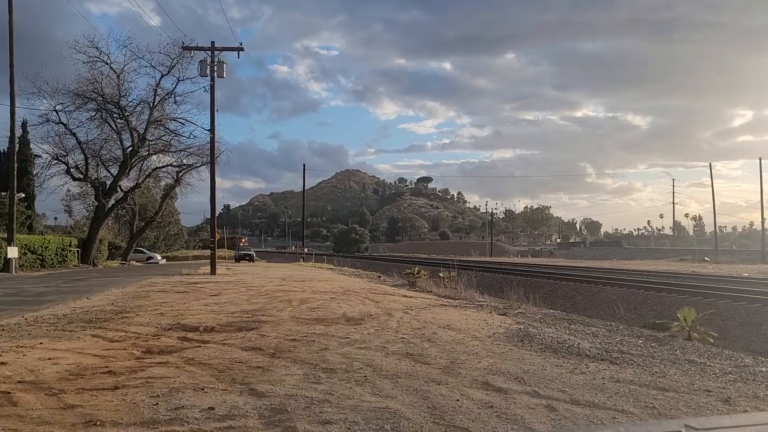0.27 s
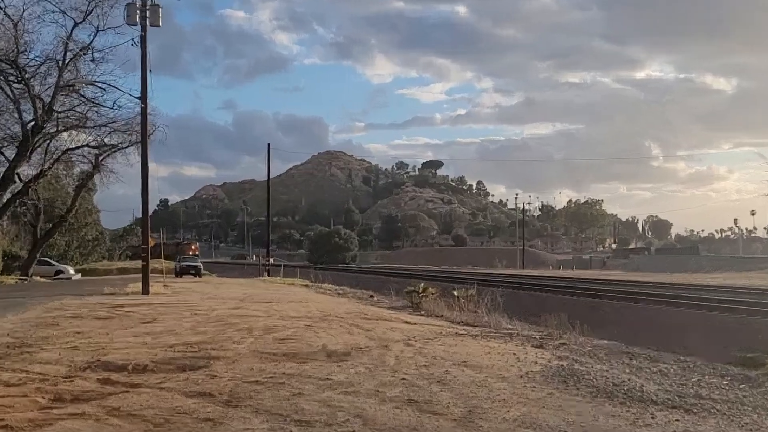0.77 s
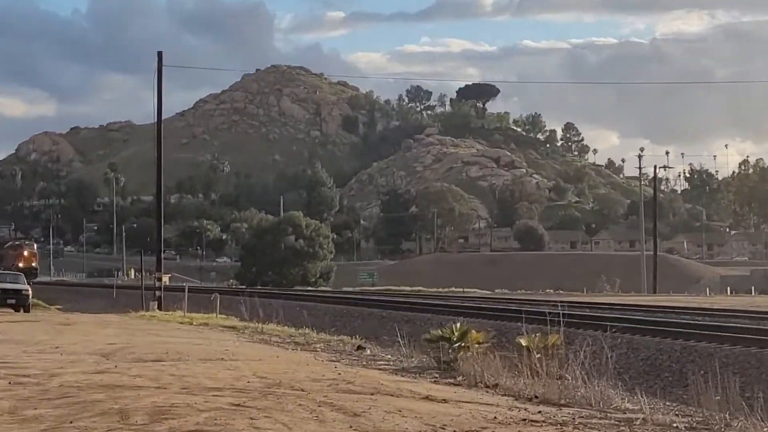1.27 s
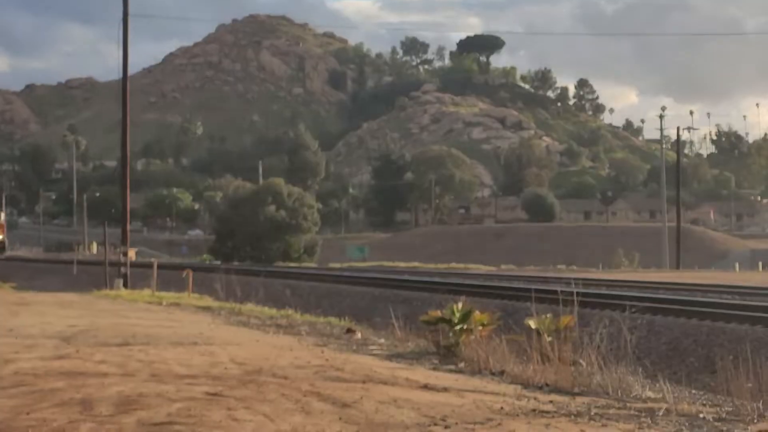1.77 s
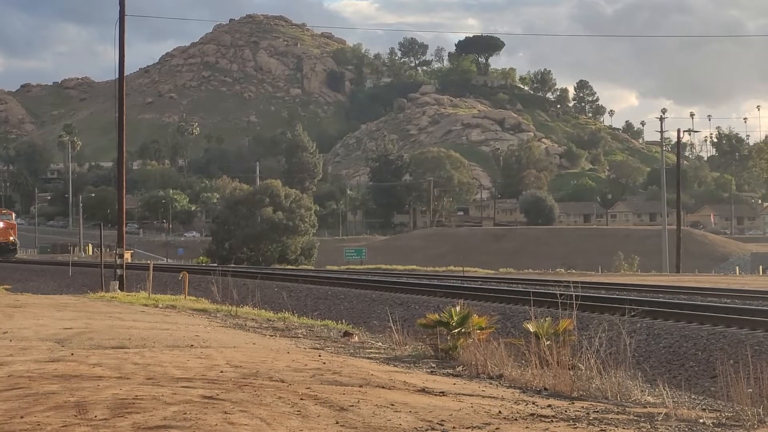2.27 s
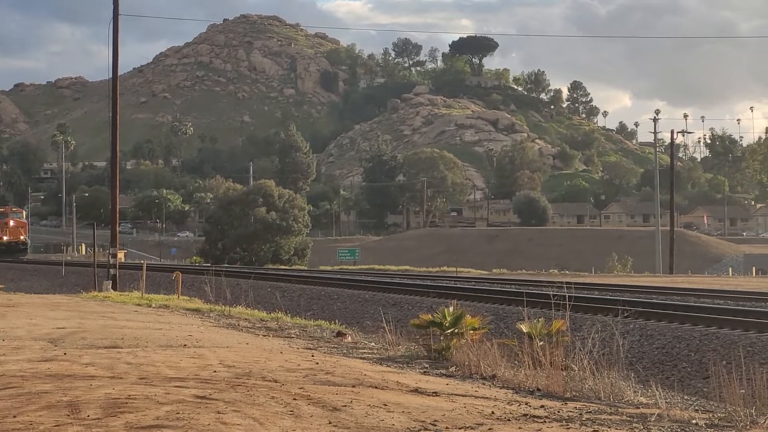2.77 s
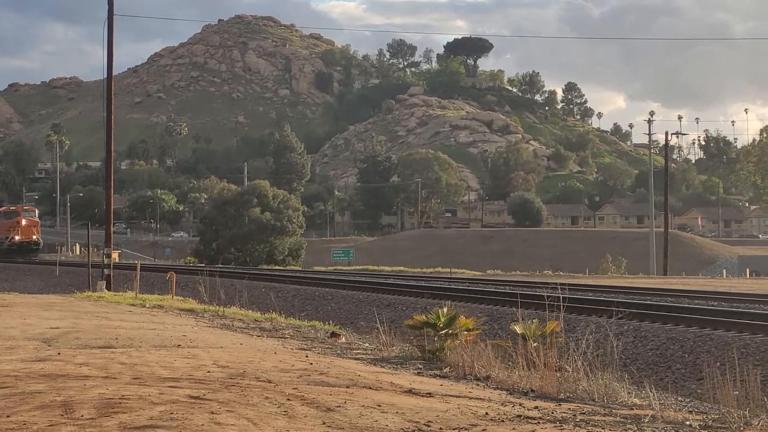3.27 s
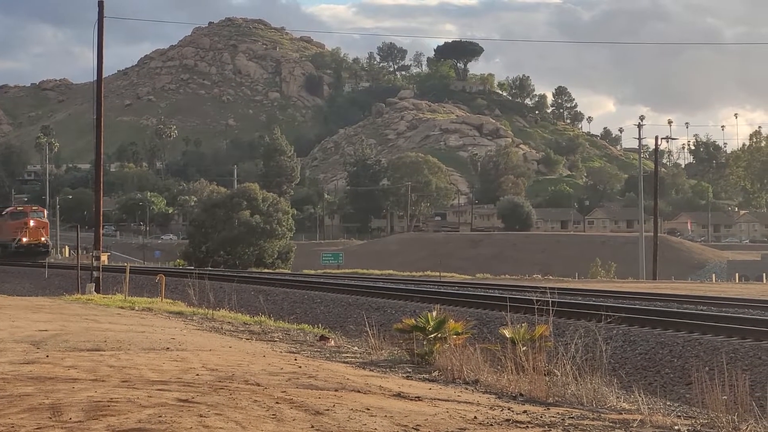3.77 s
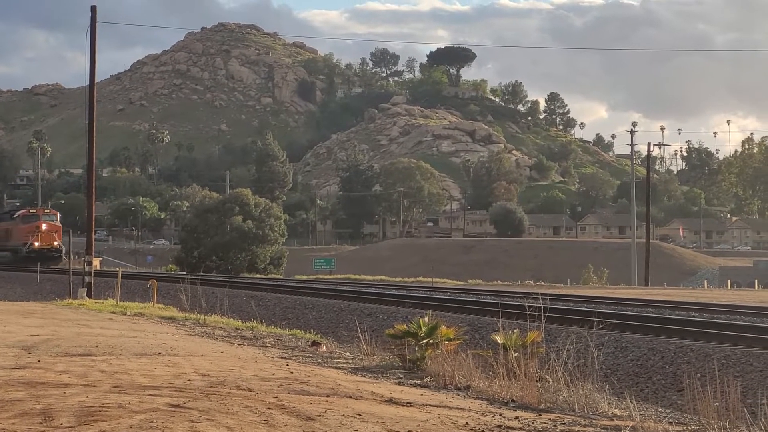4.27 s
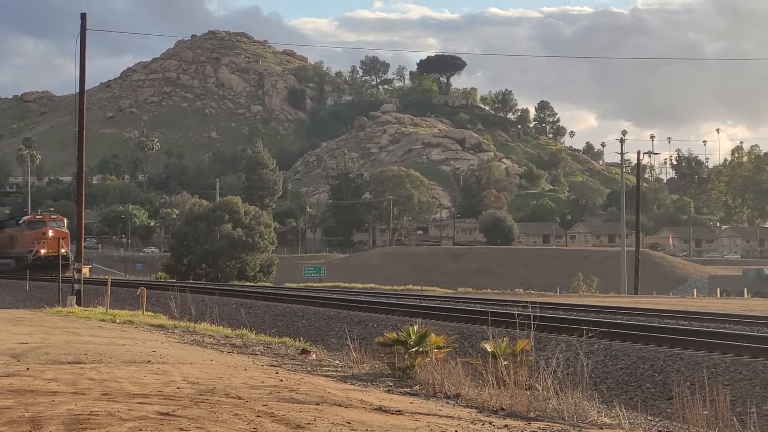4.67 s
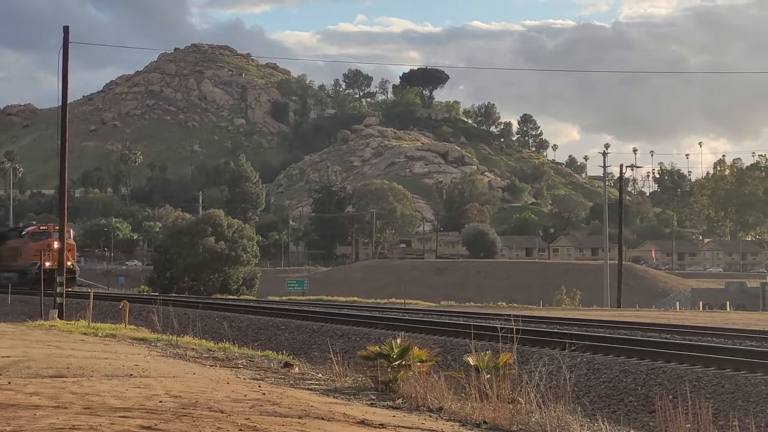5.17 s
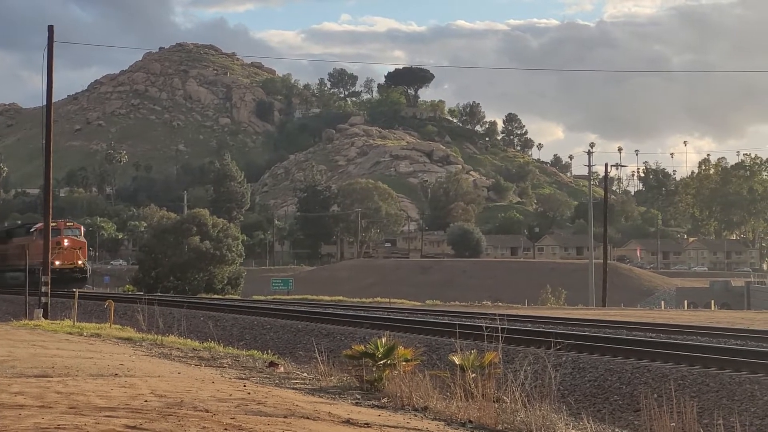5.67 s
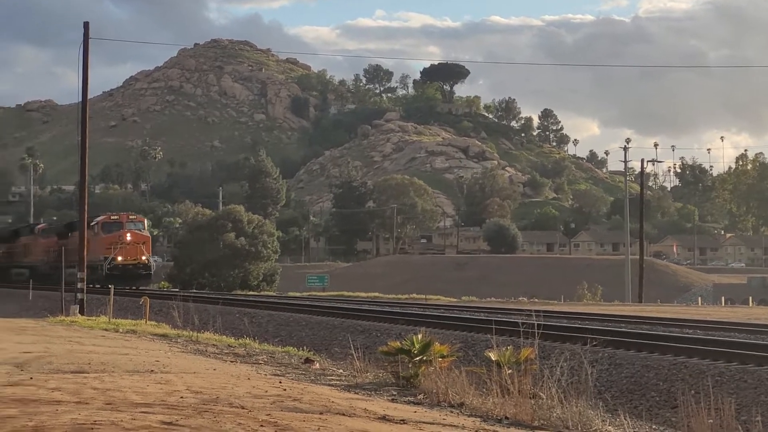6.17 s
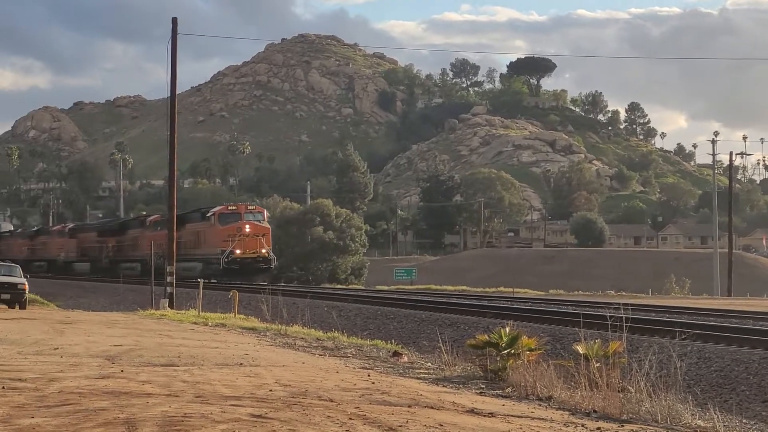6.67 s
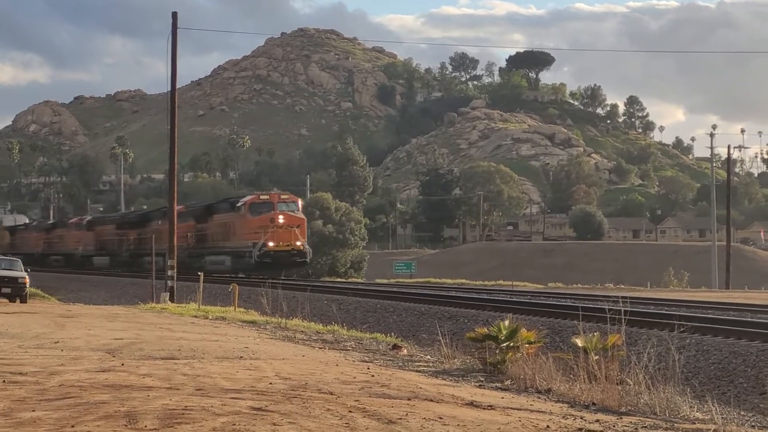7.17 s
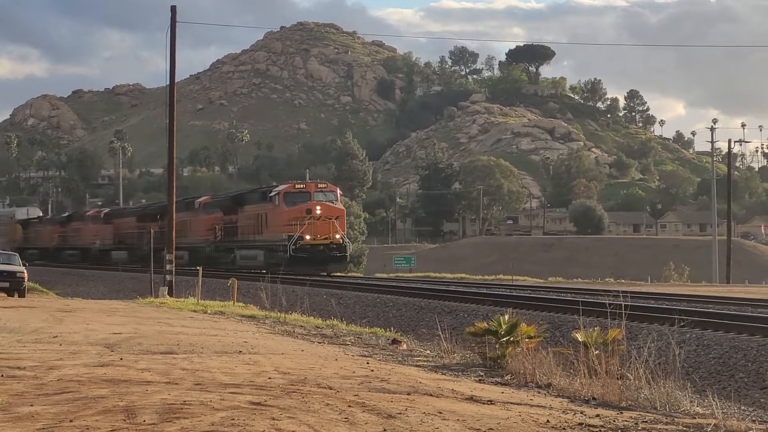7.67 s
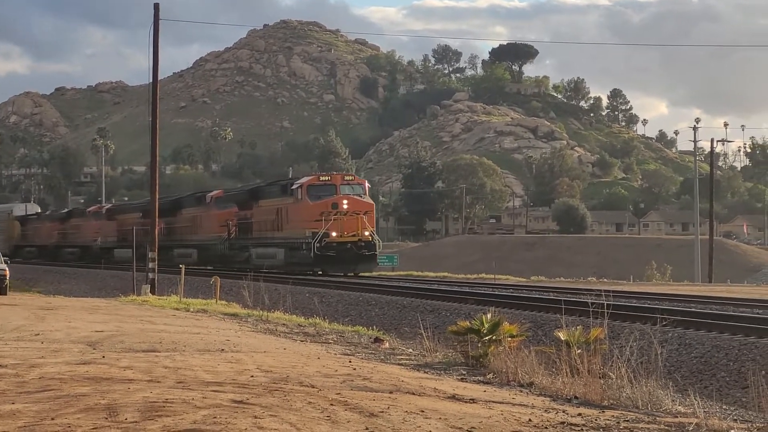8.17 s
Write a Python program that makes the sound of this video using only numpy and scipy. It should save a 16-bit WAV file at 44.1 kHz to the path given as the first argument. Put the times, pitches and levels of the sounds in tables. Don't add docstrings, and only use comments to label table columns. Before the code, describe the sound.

Open ground beside a railway, heard through a handheld stereo microphone with limited deep bass and slightly patchy, compressed treble. From 0 s, distant diesel engines throb in a low, uneven rumble with a faint blower hum, under soft traffic and rolling noise. A thin, very high rail hiss and sizzle wavers above, then leaps louder at about 3.2 s as wheels cross a joint, without a distinct clank. At 4.4 s a locomotive horn bursts in: five bells in a loud, brassy, dissonant chord with rough buzz, starting slightly sharp. A tiny tick and skip occurs near 5.0 s. From 5.1 s the blast weakens, its pitch droops, and it stops around 5.3 s. A dull, smeared hillside echo fades through the following second or so. The background recovers by 7 s; rumble, growing rail hiss and faint wavering gear whine continue to 8.4 s.

```python
import sys
import numpy as np
from scipy import signal
from scipy.fft import rfft, irfft, next_fast_len
from scipy.io import wavfile
from scipy.ndimage import uniform_filter1d

SR = 44100
rng = np.random.default_rng(int(sys.argv[2]) if len(sys.argv) > 2 else 0)


def how_loud(loudness_db):
    steps = np.asarray(loudness_db, float) / 20
    return 10 ** steps


def unload_audio(sound):
    columns = np.transpose(np.atleast_2d(sound))
    steps = np.round(np.clip(columns, -1, 1) * 32767)
    wavfile.write(sys.argv[1], SR, steps.astype(np.int16))


N = 371763

# frequency in Hz, left over right in dB.
PORT_BALANCE = [(60, 4), (110, 1), (200, 0), (1300, -0.5), (2400, 1.5), (3000, 5.5), (3600, -9.5),
                (4600, -12), (5300, -3.5), (8000, 2), (10300, -19.5), (12000, -8.5), (15000, -14)]

# multiple of the firing rate, level in dB relative to the rumble.
FIRING_ORDERS = [(2.0, -26), (3.0, -1), (3.8, -7.5), (5.0, -5), (5.6, -9.5), (6.1, -12.5), (7.0, -12)]
# time in seconds, frequency in Hz, level in dB.
BLOWER = [
    (0, 219, -46),
    (4.5, 221, -44),
    (5.3, 220, -47),
    (6.5, 213.5, -43),
    (8, 206.5, -42),
    (8.43, 205, -45),
]
# frequency in Hz, density in dB per Hz.
RUMBLE_COLOUR = [(21, -33), (36, 2.5), (65, 0), (115, -3.5), (177, -10), (236, -13.5), (330, -28),
                 (430, -53.5), (730, -120)]

# frequency in Hz, density in dB per Hz.
ROAR_COLOUR = [(150, -34), (250, -1.5), (280, -2), (388, -11), (495, -4.5), (570, -5.5), (722, -9),
               (970, -7), (1270, -8.5), (1600, -6.5), (2250, -15), (2800, -24.5), (4100, -23.5),
               (5500, -36)]
# frequency in Hz, width in Hz, level in dB (not used).
ROAR_RESONANCES = [(445, 4.1, 0), (493.4, 5.4, 0), (604, 3.4, 0), (893, 5.5, 0), (980, 17, 0)]

# time in seconds, frequency in Hz, share 0-1.
GEAR_PITCH = [
    (6.0, 447, 0),
    (6.6, 447, 1),
    (7.4, 444, 1),
    (8.43, 440, .5),
]
# multiple of the gear pitch, level in dB.
GEAR_TONES = [(1, -58.0), (1.108, -52.5), (2.01, -57.0), (2.204, -57.0)]

# frequency in Hz, density in dB per Hz.
HISS_COLOUR = [(1530, 1.5), (2600, -1.5), (2870, -6), (4100, 1.5), (5000, 0), (5410, -1), (5920, -1.5),
               (6240, 4), (6950, -8.5), (7700, -8.5), (8000, -10.5), (10400, -41), (17600, -120)]
FRINGE_COLOUR = [(8100, -20), (8250, -3), (8750, 0), (8850, -14), (9350, -14), (9450, 0), (9550, -12),
                 (10000, -8), (10330, -6)]
LOW_SONG_COLOUR = [(10330, -33), (10400, -10.5), (11000, -5.5), (11600, -1.5), (12200, 9), (12250, -0.5)]
HIGH_SONG_COLOUR = [(10500, -36), (11300, -26), (12250, -11), (12300, -1.5), (13000, 1), (13800, -2.5),
                    (14000, 3), (15000, 7), (15720, 6), (15780, -15)]
# frequency in Hz, width in Hz, level in dB (not used).
HISS_RESONANCES = [(5200, 58, 0), (5800, 53, 0), (6680, 120, 0), (7200, 84, 0), (6760, 70, 0)]
SONG_RESONANCES = [(10780, 45, -14), (11200, 52, -13), (11600, 36, -14), (11770, 70, -8), (13200, 71, -6),
                   (13370, 110, -4), (14000, 48, -1), (13800, 55, -1), (15260, 50, 0), (16500, 60, -1)]
# level in dB, share of wheel load, gain at the joint in dB, growth in dB per s,
# share of the squeeze.
SONG_LEVELS = [
    (-65.5, 0.95, 9, 1.7, 0.96),
    (-40.5, 1.03, 6.5, 0.13, 0.97),
    (-99, 0.7, 17.5, 2, .1),
]
# time in seconds, level in dB.
WHEEL_LOAD = [(0, 2), (.6, 1.5), (1.3, -1.9), (1.85, -3), (2.1, -0.2), (2.85, 2.4), (2.95, -.6), (3.3, 0.5),
              (3.7, 3.5), (4.1, -0.5), (5.45, 2.5), (6.0, 0.5), (6.6, 2.5), (7.3, 3.5), (7.6, 3),
              (8.43, 3.5)]

# pitch in Hz, speaks at in seconds, sharp at first as a share, settles in seconds,
# flat as air fails as a share.
BELL_PITCHES = [
    (274.7, 4.398, .03, .04, .002),
    (325.4, 4.405, .04, .055, .015),
    (379.0, 4.392, .06, .035, .002),
    (495.0, 4.41, .03, .03, .008),
    (531.2, 4.408, .02, .04, .006),
]
# multiple, peak level in dB, left over right in dB, trend in dB per s.
PARTIALS_1 = [(1, -21, 0, -7.5), (2, -20, 2, -5.0), (3, -31, -2, -20), (4, -24, -4, -2.5),
              (5, -37, 0, 10.0), (6, -31.5, -1, 12.0), (7, -42, 8, -5.0), (8, -51, 6, 10.0),
              (9, -44, 17, 10.0), (10, -59, 10, 7.5)]
PARTIALS_2 = [(1, -31, -2, 0.0), (2, -20, -1, 0.0), (3, -27, -2, 2.5), (4, -28, 1, -7.5),
              (5, -33, -1, -10.0), (6, -40, 9, -2.5), (7, -44, 0, -10.0), (8, -47, 11, 5.0)]
PARTIALS_3 = [(1, -26, 1, 0.0), (2, -23, -2, 10.0), (3, -41, -2, 17.5), (4, -40, -3, -2.5),
              (5, -36, 6, 20.0), (6, -44, 0, -10.0), (7, -41, 13, -10.0)]
PARTIALS_4 = [(1, -21, 1, -2.5), (2, -25, 1, 5.0), (3, -28, 0, 7.5), (4, -37, 13, 12.5), (5, -43, 11, 20.0)]
PARTIALS_5 = [(1, -17, -3, 0.0), (2, -26, 0, -2.5), (3, -40, -3, -7.5), (4, -39, 8, 15.0),
              (5, -41, 13, -10.0)]
AIR_LINE_TONES = [(2.19, -40, 0, 0), (3.057, -37, -1, 0), (3.94, -31, 0, 0), (5.13, -41, 0, 0)]
# frequency in Hz, density in dB per Hz.
BUZZ_COLOUR = [(1590, -5), (2700, -9), (2810, -7), (3830, -6), (5060, -17), (5830, -47), (6710, -20),
               (7500, -26), (9750, -67), (16500, -120)]
# held level in dB, full after in seconds, rise in dB per s,
# sag after closing in dB per s.
AIR_RESPONSE = [
    (-13.5, 0.039, 650, 57.5),
    (-19.5, 0.067, 599, 141),
    (-37, 0.059, 1000, 63),
]

# frequency in Hz, share 0-1.
EMPTY_SHARE = [(2200, 0), (2800, .4), (3400, .1), (5000, .15), (5500, .4), (6500, .3), (7400, .4),
               (8000, .75), (8300, .2), (8750, .2), (8900, .95), (9350, .95), (9450, .55), (9600, .93),
               (10300, .88), (10400, .1), (11500, .1), (12000, 0)]
# frequency in Hz, how much loud sound empties a cell.
MASKING_WEIGHT = [(5100, 0), (5400, 1), (6600, 1), (7000, .2), (8000, 0), (8900, -1.3), (10300, -1.3),
                  (10400, 0)]

VALVE_OPENS_S, VALVE_CLOSES_S, STALL_S = 4.375, 5.101, 5.31
LOST_AT_S, LOST_S = 4.9893, .02312
HELD_DB, HELD_UPPER_DB = -14.5, -19.5
HALF_SIDES = np.array([[.5], [-.5]])


def in_time(rows, t):
    seconds, *columns = np.transpose(rows)
    return [np.interp(t, seconds, column) for column in columns]


def at_hz(points, hz):
    table = np.array(points)
    return np.interp(np.log(hz + 1), np.log(table[:, 0]), table[:, 1])


def ramp(t, start, length):
    return np.clip((t - start) / length, 0, 1)


def blowing(t, ease):
    return ramp(t, VALVE_OPENS_S, ease) - ramp(t, VALVE_CLOSES_S, ease)


def ducked(t):
    return ramp(t, VALVE_OPENS_S, 0.4) - ramp(t, 6.11, 0.88)


def drift(rate, count=N):
    pole = np.exp(-80 * np.pi * rate / SR)
    coarse = rng.standard_normal(count // 40 + 2002)
    slow = signal.lfilter([1], [1, -2 * pole, pole * pole], coarse)[2000:]
    return np.interp(np.arange(count) / 40, np.arange(len(slow)), slow / slow.std())


def noise(spectrum, alike, lag_s, patchy_db, modes=(), mode_db=0, count=5):
    size = next_fast_len(N)
    hz = np.arange(size // 2 + 1) * SR / size
    shared, own = rfft(rng.standard_normal((2, size)))
    alike = np.clip(at_hz(alike, hz), 0, 1)
    left = (alike * shared + np.sqrt(1 - alike ** 2) * own) * np.exp(-2j * np.pi * hz * lag_s)
    colour = how_loud(at_hz(spectrum, hz)) * (hz > spectrum[0][0]) * (hz < spectrum[-1][0])
    for centre, width, _ in modes:
        colour = colour * how_loud(mode_db / (1 + (2 * (hz - centre) / width) ** 2))
    half_pan_db = at_hz(PORT_BALANCE, hz) / 2
    pair = np.array([left * how_loud(half_pan_db), shared * how_loud(-half_pan_db)]) * colour
    place = np.log(hz + 1) - np.log(spectrum[1][0])
    place = np.clip(place / np.log(spectrum[-2][0] / spectrum[1][0]), 0, 1) * (count - 1)
    together = drift(2.1)
    out = np.zeros((2, N))
    for k in range(count):
        band = irfft(pair * np.sqrt(np.clip(1 - abs(place - k), 0, 1)), size)[:, :N]
        out += band * how_loud(patchy_db * (1.12 * together + drift(15.0)))
    return out / np.sqrt(np.mean(out.mean(0) ** 2))


def roar(t):
    level_db = -56.5 + 0.1354 * t - 3.5 * ducked(t) + 12 * blowing(t, 0.46)
    alike = [(250, 0.92), (640, 0.63), (1400, 0.037), (3000, 0.14)]
    bed = noise(ROAR_COLOUR, alike, lag_s=0, patchy_db=0.51, modes=ROAR_RESONANCES, mode_db=7.5, count=4)
    return how_loud(level_db + 14.5) * bed


def engines(t):
    rumble_db = -32 + 0.1446 * t - 6.5 * ducked(t)
    turns = 19.85 * t + .1 * drift(.3)
    orders = np.zeros(N)
    for order, db in FIRING_ORDERS:
        swell = how_loud(db + 3.5 * drift(2.8))
        orders += swell * np.sin(2 * np.pi * (order * turns + rng.random()) + 0.37 * drift(2.4))
    hz, blower_db = in_time(BLOWER, t)
    blower = how_loud(blower_db + 2.5 + 1.5 * drift(3.7)) * np.sin(2 * np.pi * np.cumsum(hz) / SR)
    rumble = noise(RUMBLE_COLOUR, [(30, 0.87), (300, 0.94)], lag_s=0, patchy_db=0.5, count=4)
    return how_loud(rumble_db) * (how_loud(-2.0) * rumble + orders * how_loud([[.6], [-.6]])) + blower


def gears(t):
    hz, share = in_time(GEAR_PITCH, t)
    turns = np.cumsum(hz) / SR
    tones = np.zeros(N)
    for k, db in GEAR_TONES:
        tones += how_loud(db + 3 + 3 * drift(4)) * np.sin(2 * np.pi * k * turns + .6 * drift(5))
    return share * tones


def rails(t):
    joint_s = 3.16
    hiss_db = np.minimum(-82 + 4 * t, -54) - 7 * ducked(t)
    surge_db = np.where(t < joint_s, 1.4, 0.55) * drift(8)
    load_db = in_time(WHEEL_LOAD, t)[0] + surge_db - 1.5 * ducked(t)
    squeeze_db = -4 * blowing(t, 0.23)
    crossed = ramp(t, joint_s, 0.012)
    low_db, high_db, fringe_db = (
        db + share * load_db + joint_db * crossed + db_per_s * t + give * squeeze_db
        for db, share, joint_db, db_per_s, give in SONG_LEVELS)
    hiss = noise(HISS_COLOUR, [(2600, .6), (8000, .5)], lag_s=-9e-5, patchy_db=.7,
                 modes=HISS_RESONANCES, mode_db=7, count=3)
    low = noise(LOW_SONG_COLOUR, [(10000, 0.92), (12000, 0.94)], lag_s=-0.00011, patchy_db=0.0,
                modes=SONG_RESONANCES, mode_db=9.0, count=2)
    high = noise(HIGH_SONG_COLOUR, [(12000, .85), (16000, .88)], lag_s=-9e-5, patchy_db=.5,
                 modes=SONG_RESONANCES, mode_db=7, count=3)
    fringe = noise(FRINGE_COLOUR, [(8000, .6), (10000, .7)], lag_s=-9e-5, patchy_db=1, count=2)
    return how_loud(hiss_db + 10.5) * hiss + how_loud(low_db) * low + how_loud(high_db) * high + how_loud(fringe_db + 8) * fringe


def hillside(x):
    t = np.arange(round(1.4 * SR)) / SR
    shape = how_loud(-60 * t / 2.2) * np.clip(t / 0.071, 0, 1)
    shared, *own = rng.standard_normal((3, len(t)))
    dull = signal.butter(1, 600, fs=SR, output="sos")
    scatter = signal.sosfilt(dull, (shared + 0.15 * np.array(own)) * shape)
    return signal.fftconvolve(x, scatter / np.sqrt(np.sum(scatter ** 2, 1, keepdims=True)), axes=1)


def air(t):
    stall_db = 334 * np.maximum(t - STALL_S, 0)
    levels = []
    for held, full, rise, sag in AIR_RESPONSE:
        missing_db = rise * np.maximum(VALVE_OPENS_S + full - t, 0)
        levels.append(held - missing_db - sag * np.maximum(t - VALVE_CLOSES_S, 0) - stall_db)
    return levels


def top_partials(hz, listed):
    return [(k, -46.5 + 5 * rng.standard_normal(), -8, 0)
            for k in range(listed + 1, 20) if 2900 < k * hz < 4399]


def bells(t):
    loud_db, upper_db, _ = air(t)
    failing = np.clip((HELD_DB - loud_db + 1.5) / 15, 0, 1) * (t > 5)
    moved = np.clip(t, 4.4, 5.15) - 4.75
    after = np.clip((t - LOST_AT_S) / .0002 + .5, 0, 1)
    stacks = (AIR_LINE_TONES + PARTIALS_1, PARTIALS_2, PARTIALS_3, PARTIALS_4, PARTIALS_5)
    out = np.zeros((2, len(t)))
    for (hz, start, sharp, settle, flat), partials in zip(BELL_PITCHES, stacks):
        bend = sharp * np.exp(-np.clip(t - start, 0, 9) / settle) - flat * failing
        turns = hz * (t + np.cumsum(bend) / SR)
        speaks = np.clip((t - start) / .015 + .5, 0, 1)
        for k, peak_db, pan_db, trend_db in partials + top_partials(hz, len(partials)):
            high = np.clip(np.log2(k * hz / 600), 0, 1)
            waver = min((k * hz / 1300) ** 2, 1.7) * drift(18, count=len(t))
            air_db = (1 - high) * (loud_db - HELD_DB) + high * (upper_db - HELD_UPPER_DB)
            level_db = peak_db + trend_db * moved + air_db
            sides = how_loud(HALF_SIDES * pan_db)
            gain = speaks * how_loud(level_db + 0.95 * waver) * sides / np.sqrt(np.mean(sides ** 2))
            lead = HALF_SIDES * k * hz * 1e-4
            phase = 2 * np.pi * (k * turns + lead + rng.random()) + 0.51 * waver
            skipped = phase + 2 * np.pi * k * hz * LOST_S
            out += gain * ((1 - after) * np.sin(phase) + after * np.sin(skipped))
    return out


def horn():
    first, last = round(VALVE_OPENS_S * SR), round((STALL_S + 0.13) * SR)
    t = np.arange(first, last) / SR
    tones = bells(t)
    tones += .12 * tones ** 2
    buzz = noise(BUZZ_COLOUR, [(2000, .85), (8000, .65)], lag_s=-1e-4, patchy_db=.8, count=3)[:, first:last]
    beat = 1 + np.abs(signal.hilbert(tones.mean(0))) * how_loud(-HELD_DB)
    gust_db = 1.0 * drift(15, count=len(t))
    blast = tones + .5 * buzz * beat * how_loud(air(t)[2] + gust_db)
    back = how_loud(-29.0) * hillside(blast * (0.62 + 0.6 * drift(25, count=len(t))))
    out = np.zeros((2, N))
    distance = signal.butter(6, 10500, fs=SR, output="sos")
    out[:, first:last] = signal.sosfilt(distance, blast)
    out[:, first:first + back.shape[1]] += back
    return out


def scene():
    t = np.arange(N) / SR
    return roar(t) + engines(t) + gears(t) + rails(t) + horn()


def starve(x, masking, order=8):
    hz, _, cells = signal.stft(x, SR, window="cosine", nperseg=2048)
    centre = hz[order // 2::order]
    loud_db = 10 * np.log10(np.sum(np.abs(cells) ** 2, 1, keepdims=True) + 1e-16)
    luck = uniform_filter1d(rng.standard_normal((2, len(centre), cells.shape[-1])), 4, axis=-1)
    margin = 2 * luck - masking * at_hz(MASKING_WEIGHT, centre)[:, None] * loud_db
    rank = margin.argsort(-1).argsort(-1) / margin.shape[-1]
    keep = rank >= at_hz(EMPTY_SHARE, centre)[:, None]
    cells[:, :1024] *= np.repeat(keep, order, axis=1) * (hz[:1024, None] < 15800)
    return signal.istft(cells, SR, window="cosine", nperseg=2048)[1][:, :N]


def low_pass(x):
    return signal.sosfilt(signal.butter(12, 16960, fs=SR, output="sos"), x)


def record(dry):
    bass_cut = signal.butter(4, 35, "high", fs=SR, output="sos")
    wet = signal.sosfilt(bass_cut, dry)
    wet = starve(1.1 * np.tanh(wet / 1.1), masking=.09)
    wet[:, round(LOST_AT_S * SR) + np.arange(6)] += how_loud(-24) * np.diff(np.hanning(7))
    return low_pass(wet)


dry = scene()
out = record(dry)
unload_audio(out)
```